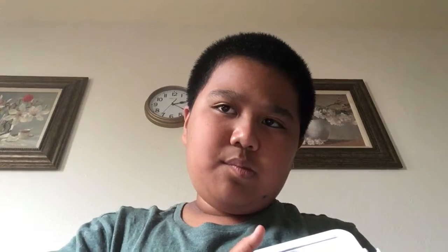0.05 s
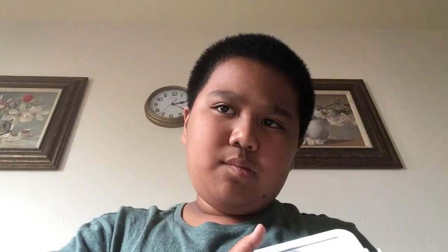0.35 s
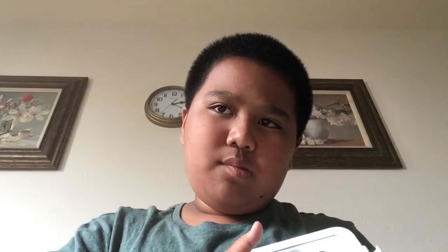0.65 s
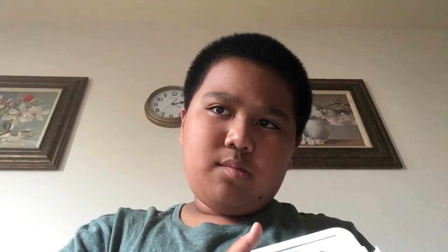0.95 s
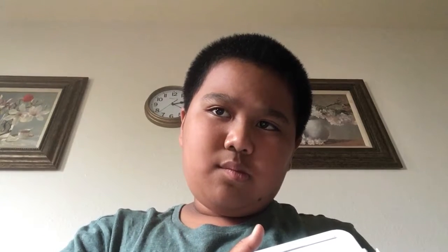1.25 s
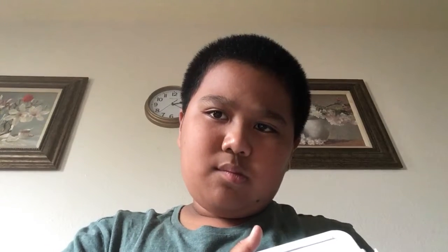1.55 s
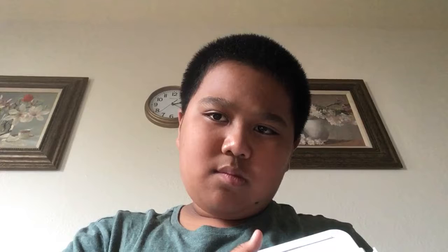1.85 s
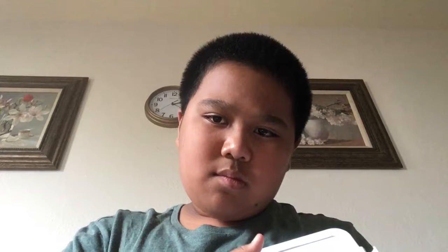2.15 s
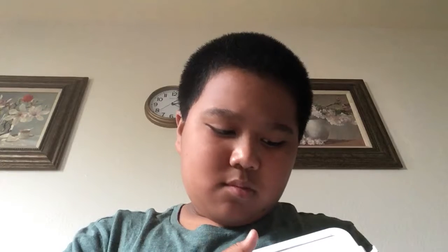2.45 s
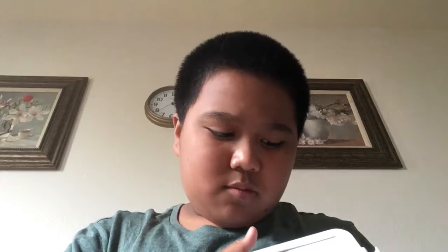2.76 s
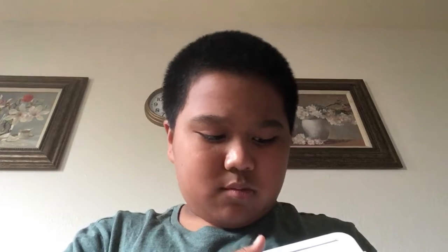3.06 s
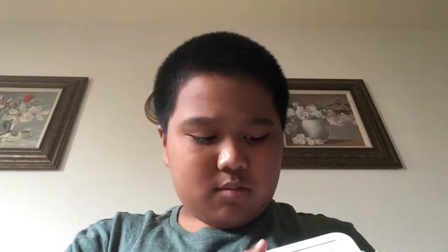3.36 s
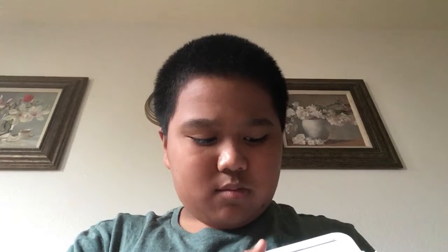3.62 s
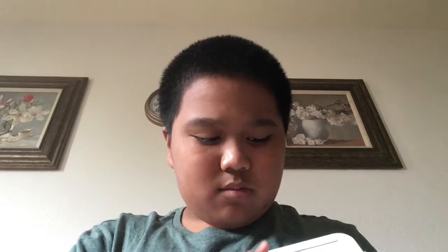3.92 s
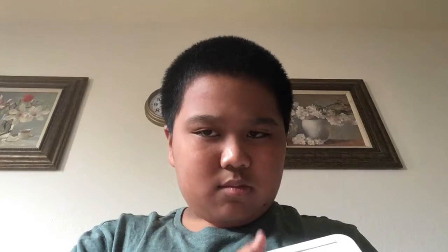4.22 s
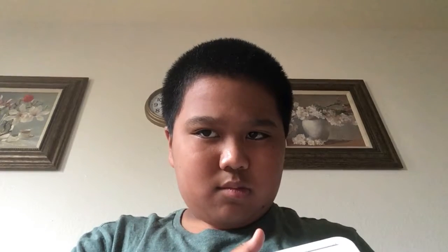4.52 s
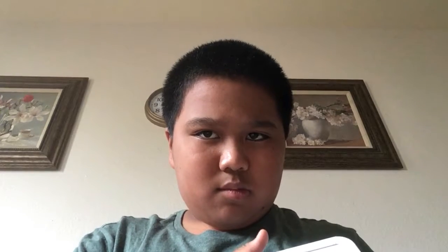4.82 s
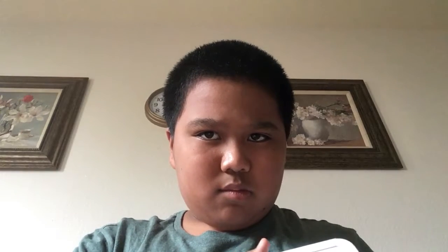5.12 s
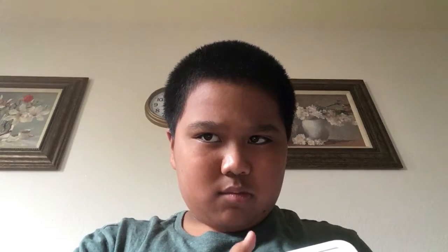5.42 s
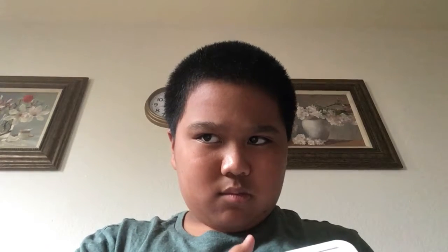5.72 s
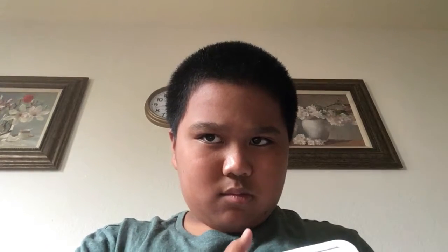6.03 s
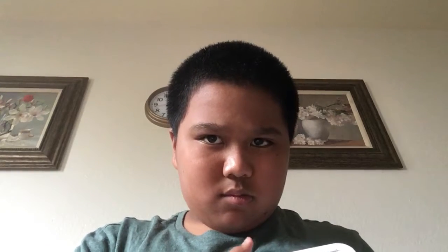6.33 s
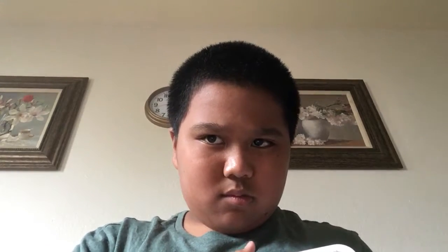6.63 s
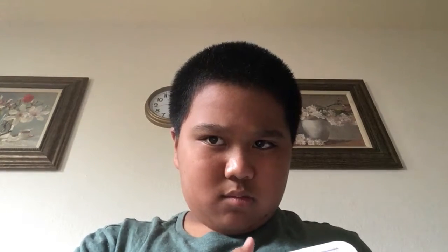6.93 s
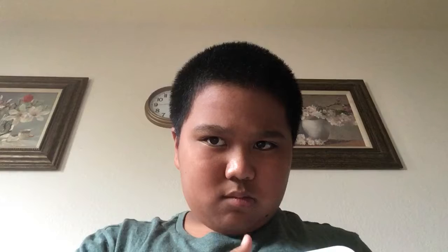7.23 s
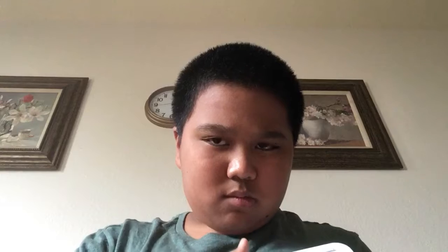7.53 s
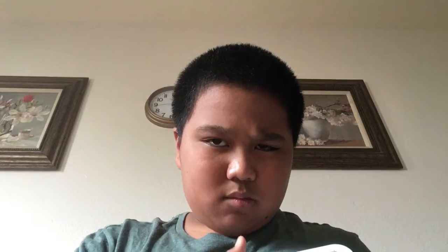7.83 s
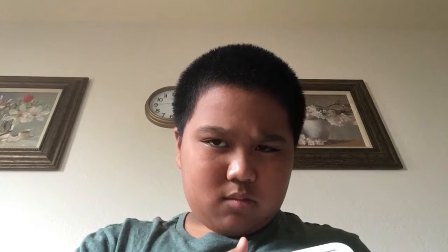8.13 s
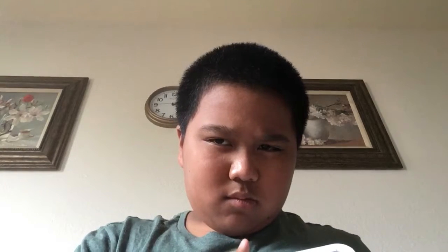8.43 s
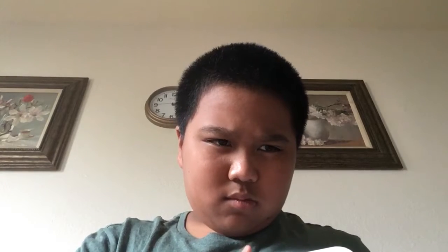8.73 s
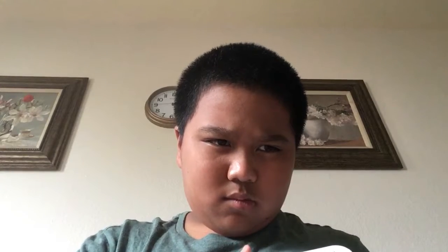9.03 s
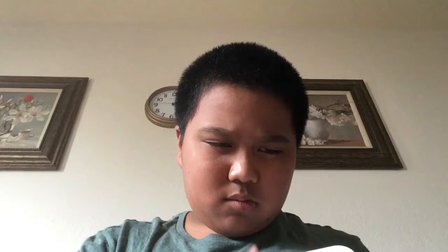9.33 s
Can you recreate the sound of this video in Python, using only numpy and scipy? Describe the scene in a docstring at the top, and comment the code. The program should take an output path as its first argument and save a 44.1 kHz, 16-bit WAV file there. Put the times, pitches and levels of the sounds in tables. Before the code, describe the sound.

Fingers drum on a hard plastic slab held right at the microphone, each tap a short, hollow knock with a small tick on top. For the first 3 seconds the taps come in light, quick, uneven runs with brief pauses and faint sliding of skin on plastic. From about 3 to 4.3 seconds they grow firmer, with a couple of nail clicks. After a short pause, single hard blows land at about 5.1, 5.7, 6.0, 6.4, 7.1 and 7.4 seconds, the hardest slightly overloading the microphone. A deep handling thump comes near 5.4 seconds. More strong knocks follow at about 8.0, 8.4 and 8.9 seconds with lighter taps between them, and a softer last one falls near 9.1 seconds. The holding hand rumbles low beneath the taps throughout. The small room adds a short, slight reverberation and a faint steady hiss.

```python
"""Fingers drum on a hard plastic slab held right at the microphone: light quick runs, then single blows.
Each tap is a tick of skin, a knock of about a millisecond and the slow push of the fingertip;
knock and push drive the damped modes of the casing. The hardest blows overload the recorder.
A small room reverberates, and beneath the taps the holding hand rumbles, fingers slide and nails click."""
import sys
import numpy as np
from scipy import signal
from scipy.fft import rfft, irfft, next_fast_len
from scipy.io import wavfile
from scipy.ndimage import map_coordinates

SR = 44100
rng = np.random.default_rng(int(sys.argv[2]) if len(sys.argv) > 2 else 0)


def waveform_to_disk(signal):
    """Save audio, clipped to [-1, 1], as 16-bit WAV at the path in sys.argv[1]."""
    frames = np.transpose(np.atleast_2d(signal))
    scaled = np.clip(frames, -1, 1) * 32767
    samples = np.round(scaled).astype(np.int16)
    wavfile.write(sys.argv[1], SR, samples)


N = 413216


def amp(db):
    """Amplitude ratio of a level in decibels."""
    return 10 ** (np.asarray(db) / 20)


def unit(x):
    """Normalisation to an rms of 1."""
    return x / np.sqrt(np.mean(x ** 2) + 1e-20)


def along(points, hz):
    """Interpolation of (frequency, value) points on a logarithmic frequency axis."""
    f, v = np.transpose(points)
    return np.interp(np.log(hz + 1), np.log(f + 1), v)


def filtered(x, response):
    """Linear filtering: the spectrum is multiplied by a frequency response."""
    size = next_fast_len(len(x) + SR // 20, real=True)
    return irfft(rfft(x, size) * response(np.fft.rfftfreq(size, 1 / SR)), size)[:len(x)]


def noise(spectrum, size):
    """Spectral shaping turns white noise into coloured noise of rms 1."""
    return unit(filtered(rng.standard_normal(size), lambda hz: amp(along(spectrum, hz))))


def add(track, sound, s):
    """Superposition: a sound joins the track at s seconds."""
    start = round(s * SR)
    part = sound[max(0, -start):len(track) - start]
    track[max(0, start):][:len(part)] += part


def burst(t, life_s):
    """Exponential decay after a sudden onset at t = 0."""
    return (t >= 0) * np.exp(-np.abs(t) / life_s)


# Each row: frequency in Hz, relative spectral density in dB.
AIR_SPECTRUM = [(20, -8), (100, 0), (250, -3), (550, -5), (1000, -12), (2000, -17), (4000, -23),
                (8000, -26.5), (16000, -29)]

def air(level_db=-68.5):
    """Ambient noise: the faint, steady hiss of a quiet room."""
    return amp(level_db) * noise(AIR_SPECTRUM, N)


# Each row: frequency in Hz, relative spectral density in dB.
GRIP_SPECTRUM = [(10, 5.5), (25, 6.5), (45, -8), (70, -11.5), (120, -25.5), (250, -31.5), (800, -58)]

def grip(rest_db=-54, brace_db=-45.5, db_per_knock_db=0.3, width_s=0.098, lag_s=0.028):
    """Structure-borne noise: the holding hand rumbles as it braces round each tap; the powers add."""
    t = np.linspace(0, N / SR, N // 200)
    power = amp(rest_db) ** 2
    for s, _, knock_db, _, _ in taps():
        bracing = np.exp(-0.5 * ((t - s - lag_s) / width_s) ** 2)
        power += (amp(brace_db + db_per_knock_db * knock_db) * bracing) ** 2
    return np.interp(np.arange(N) / SR, t, np.sqrt(power)) * noise(GRIP_SPECTRUM, N)


# Each row: centre in seconds, frequency in Hz, level in dB, half length in seconds.
HAND_JOGS = [(5.416, 53, -12.5, 0.01), (6.013, 40, -37, 0.026), (6.399, 58, -23, 0.0077)]

def jogs():
    """Rigid-body motion: the hand jogs the whole slab through a cycle or two of deep oscillation."""
    t = np.arange(N) / SR
    return -sum(amp(db) * np.exp(-((t - s) / width) ** 2) * np.cos(2 * np.pi * hz * (t - s))
                for s, hz, db, width in HAND_JOGS)


# Each row: frequency in Hz, relative spectral density in dB.
FRICTION_SPECTRUM = [(300, -2), (1000, 10), (2000, 2), (3000, -3), (5000, -4.5), (8000, -15.5),
                     (16000, -22.5)]

def friction(size, grain_db=4, slip_samples=40):
    """Stick-slip friction: tiny slips of skin on plastic modulate a noise."""
    steps = rng.standard_normal(size // slip_samples + 4)
    slips = map_coordinates(steps, [np.arange(size) / slip_samples], order=1)
    return unit(amp(grain_db * slips) * noise(FRICTION_SPECTRUM, size))


# Each row: centre in seconds, half length in seconds, level in dB.
FINGER_SLIDES = [(0.113, 0.029, -62), (.2, 0.029, -63), (0.3, 0.023, -64.5), (0.785, 0.021, -68.5),
                 (1.105, 0.023, -61.5), (2.84, 0.019, -65), (5.627, 0.022, -76.5), (6.3, 0.038, -68)]

def slides():
    """Sliding friction swells and fades as the fingers change place."""
    t = np.arange(N) / SR
    envelope = sum(amp(db) * np.exp(-((t - s) / width) ** 2) for s, width, db in FINGER_SLIDES)
    return envelope * friction(N)


# Each row: frequency in Hz, reverberation time (60 dB of decay) in seconds.
REVERB_TIMES = [(100, 0.04), (600, 0.29), (1500, 0.28), (4000, 0.063), (12000, 0.12)]
# Each row: frequency in Hz, relative gain of the radiation into the room in dB.
RADIATION = [(40, -28), (150, -14), (300, -1), (600, 1), (1200, 2.5), (2500, 2.5), (6000, 4), (9000, -6),
             (15000, -18)]

def room(x, build_up_s=0.00067):
    """Reverberation: a diffuse field in which each frequency decays at its own rate."""
    hz, t, spectra = signal.stft(rng.standard_normal(SR // 3), SR, nperseg=256)
    decay = amp(-60 * t / along(REVERB_TIMES, hz)[:, None])
    tail = signal.istft(spectra * decay, SR, nperseg=256)[1]
    tail *= 1 - np.exp(-np.arange(len(tail)) / SR / build_up_s)
    radiated = filtered(x, lambda f: amp(along(RADIATION, f)))
    return signal.fftconvolve(radiated, tail / np.linalg.norm(tail))[:N]


# Each row: resonance frequency in Hz, bandwidth in Hz, peak gain in dB.
CASING_MODES = [(52, 150, -21.5), (204.3, 115, -6), (317, 240, -14.5), (637, 170, -11), (827, 430, -2),
                (1180, 110, -7), (1514, 630, -7), (1866, 1400, 5.5), (2684, 292, -5.5)]

def casing(hz):
    """Modal superposition: the slab's response to a force is a sum of damped resonances."""
    return -sum(amp(db) * 1j * hz * width / (mode_hz ** 2 - hz ** 2 + 1j * hz * width)
                for mode_hz, width, db in CASING_MODES)


# Each row: time of the peak in seconds, force level in dB.
PAD_PRESSES = [(1.572, -21.5), (1.98, -15.5), (2.246, -18), (4.926, -24), (5.587, -16.5), (6.007, -17),
               (6.278, -15), (7.037, -10.5)]

def presses(rise_s=0.0026, fall_s=0.0071):
    """Soft contact: a settling fingertip is a slow force, so the casing gives only a dull bump."""
    force = np.zeros(N)
    t = np.arange(-SR // 50, SR // 15) / SR
    pulse = np.exp(-(t / np.where(t < 0, rise_s, fall_s)) ** 2)
    for s, db in PAD_PRESSES:
        add(force, amp(db) * pulse, s + t[0])
    return filtered(force, casing)


# Each row: frequency in Hz, relative spectral density in dB.
TICK_SPECTRUM = [(150, -15), (500, 0.5), (1500, 3), (3000, -3.5), (5000, -6.5), (8000, -12.5), (12000, -14),
                 (16000, -23.5)]

def tick_noise(size):
    """Brief contact has a broad spectrum: the noise within every tick and click."""
    return noise(TICK_SPECTRUM, size)


# Each row: start in seconds, level in dB.
NAIL_CLICKS = [(3.478, -34), (4.019, -57), (4.272, -38.5), (5.407, -45), (5.915, -55.5), (6.975, -55),
               (8.104, -54), (9.074, -53.5), (9.263, -53)]

def small_clicks(life_s=0.0023, room_db=-20, heavy_push_db=-7, clack_delay_s=0.016, clack_db=-21):
    """Impulsive transients: nails catch the shell, and it clacks as it gives under a heavy push."""
    clacks = [(s + clack_delay_s, tick_db + clack_db)
              for s, push_db, _, _, tick_db in taps() if push_db > heavy_push_db]
    track = np.zeros(N)
    t = np.arange(SR // 40) / SR
    for s, db in NAIL_CLICKS + clacks:
        add(track, amp(db) * burst(t, life_s) * tick_noise(len(t)), s)
    return track + amp(room_db) * room(track)


# Each row: frequency in Hz, relative spectral density in dB.
SWAY_SPECTRUM = [(15, -3), (40, 8), (75, 5.5), (130, -6.5), (250, -16.5), (600, -52)]

def sway(t, push_db, knock_db, push_share_db=-29, knock_share_db=-35, rise_s=0.0039, life_s=0.023):
    """Damping: a blow sets the slab rocking, and the soft grip soon absorbs the motion."""
    strength = amp(push_db + push_share_db) + amp(knock_db + knock_share_db)
    return strength * (burst(t, life_s) - burst(t, rise_s)) * noise(SWAY_SPECTRUM, len(t))


# Each row: frequency in Hz, level relative to the tick in dB, decay time constant in seconds.
SHELL_MODES = [(2115, -9, 0.002), (2740, -12.5, 0.0018), (3580, -14.5, 0.0023), (5074, -20, 0.0025)]

def shell(t, spread_db=3, detune=0.032):
    """Free vibration: the thin shell rings under a nail, a little differently at every spot."""
    return sum(amp(db + rng.normal(0, spread_db)) * burst(t, life_s)
               * np.sin(2 * np.pi * hz * rng.normal(1, detune) * t) for hz, db, life_s in SHELL_MODES)


def graze(t, lead_s=0.0029, width_s=0.0017):
    """Friction before impact: the skin skims the face for an instant, then lands."""
    return np.exp(-((t + lead_s) / width_s) ** 2) * friction(len(t))


def tick(t, contact_s, life_s=0.0012, rebound_db=-11, scuff_db=-24, scuff_s=0.015, graze_db=-19):
    """Contact noise: skin and nail jolt the casing, tick, ring the shell, rebound once and scuff."""
    touch = t + min(2 * contact_s, 0.0022)  # the skin lands just before the force peaks
    jolt = filtered(burst(touch, life_s), casing)
    rebound_gain = amp(rebound_db + rng.normal(0, 2))
    rebound_delay_s = rng.uniform(0.003024, 0.00324)
    rebound = rebound_gain * burst(touch - rebound_delay_s, life_s / 2)
    scuff = amp(scuff_db) * burst(touch, scuff_s) * friction(len(t))
    click = (burst(touch, life_s) + rebound) * tick_noise(len(t))
    return jolt + click + shell(touch) + scuff + amp(graze_db) * graze(touch)


def knock(t, push_db, knock_db, contact_s, roundness=1.702, push_delay_s=0.0061, push_width_s=0.0047,
          landing_db=-15, landing_s=0.00085):
    """Impact excitation: the pad lands, the force peaks as it bottoms out, and a softer push follows."""
    landing = amp(knock_db + landing_db) * np.exp(-((t + min(contact_s, 0.0018)) / landing_s) ** 2)
    peak = amp(knock_db) * np.exp(-np.abs(t / contact_s) ** roundness)
    push = amp(push_db) * np.exp(-0.5 * ((t - push_delay_s) / push_width_s) ** 2)
    return filtered(landing + peak + push, casing)


# Each row: time in seconds, level in dB of the push behind a 0 dB knock.
HAND_WEIGHT = [(0, -14), (1.3, -16), (1.7, -2.5), (2.1, -4), (2.5, -14), (3.4, -20.5), (3.75, -5.5),
               (5.5, -3), (9.37, -4.5)]
# Each row: time of the peak in seconds, knock level in dB, contact half length in ms, tick level in dB.
FINGER_TAPS = [(0.0784, -19.5, 1.9, -56), (0.113, -18.5, 0.43, -38), (0.1529, -3.5, 0.6, -32),
               (0.2269, -10.5, 1.02, -59), (0.2442, -4, 1, -46.5), (0.4716, -12, 0.577, -38.5),
               (0.5211, -7, 0.64, -34.5), (0.7579, -17.5, 2.06, -56), (0.8104, -23, 0.42, -41.5),
               (0.9055, -15, 0.51, -41.5), (0.958, -16, 0.62, -43), (1.0467, -13.5, 1.78, -55.5),
               (1.1829, -14.5, 0.44, -40), (1.2812, -13.5, 0.64, -40), (1.3565, -18.5, 1.85, -56.5),
               (1.7, -20, 2, -43), (1.8315, -18, 0.88, -40.5), (1.9965, -28, 1.15, -51),
               (2.0785, -17, 0.98, -38.5), (2.2694, -14.5, 1.46, -48), (2.3153, -19, 0.98, -42),
               (2.4812, -5, 1.57, -44), (2.5108, -6.5, 1.07, -42), (2.5836, -20.0, 0.9, -47.5),
               (2.7354, -5.0, 1.53, -47), (2.7542, -5, 1.08, -43), (2.868, -11.5, 0.73, -41.5),
               (3.0091, -6.5, 1.47, -39), (3.033, -4.5, 1.18, -36.5), (3.1248, -3.5, 0.89, -36),
               (3.2966, -6.5, 1.6, -35.5), (3.3156, -1.5, 1.17, -32.5), (3.413, -2.5, 0.79, -34),
               (3.5807, 2.5, 1.34, -28.5), (3.7448, 4.0, 0.62, -30), (3.934, -7, 1.16, -41.5),
               (4.084, 2, 0.67, -32.5), (4.2492, 1, 0.71, -31.5), (5.1122, 6.5, 0.68, -27),
               (5.3496, -22, 2.1, -68), (5.4213, -7.5, 1.41, -39.5), (5.7296, 9, 0.54, -18.5),
               (6.044, 2.5, 0.91, -27.5), (6.3812, 12.0, 0.5, -22.5), (7.0923, 7.0, 0.89, -20.5),
               (7.4237, 11.5, 0.46, -13.5), (7.6694, -13.0, 1.9, -52.5), (7.6785, -12.5, 1.32, -45),
               (7.714, -2.0, 1.18, -32), (7.8918, -8.5, 1.62, -71.5), (7.9742, 8.0, 0.52, -21),
               (8.1709, -9, 0.84, -34.5), (8.2623, -17.5, 1.7, -71), (8.3517, 7.5, 0.51, -24),
               (8.5684, -14.5, 1.28, -56), (8.631, -12, 1.23, -39.5), (8.8014, -10.0, 1.68, -57),
               (8.8939, 5, 0.58, -22), (9.1087, -3.5, 0.95, -33.5)]

def taps(db_per_knock_db=0.5):
    """A power law gives each tap its push, which grows with the knock and the weight of the hand."""
    s, knock_db, contact_ms, tick_db = np.transpose(FINGER_TAPS)
    push_db = np.interp(s, *np.transpose(HAND_WEIGHT)) + db_per_knock_db * knock_db
    return zip(s, push_db, knock_db, contact_ms / 1000, tick_db)


def fingers(knock_room_db=-24, tick_room_db=-19):
    """Two transmission paths: each tap arrives through the casing and, far weaker, through the room."""
    knocks, ticks, rocking = np.zeros((3, N))
    t = np.arange(-SR // 50, SR // 9) / SR
    for s, push_db, knock_db, contact_s, tick_db in taps():
        add(knocks, knock(t, push_db, knock_db, contact_s), s + t[0])
        add(ticks, amp(tick_db) * tick(t, contact_s), s + t[0])
        add(rocking, sway(t, push_db, knock_db), s + t[0])
    reverberation = room(amp(knock_room_db) * knocks + amp(tick_room_db) * ticks)
    return knocks + ticks + rocking + reverberation


def scene():
    """Superposition of handling noise, taps, room hiss and small clicks in one channel."""
    handling = presses() + slides() + jogs() + grip()
    return (handling + fingers() + air() + small_clicks())[None]


def record(dry, hardness=14, rolloff_hz=14800, band_limit_hz=16000):
    """Saturation and band limiting: the hardest blows clip at full scale, and the top treble is cut."""
    x = dry[0]
    clipped = x / (1 + np.abs(x) ** hardness) ** (1 / hardness)
    dulled = filtered(clipped, lambda hz: 1 / np.sqrt(1 + (hz / rolloff_hz) ** 10))
    return filtered(dulled, lambda hz: 1 / (1 + (hz / band_limit_hz) ** 120))[None]


dry = scene()
out = record(dry)
waveform_to_disk(out)
```